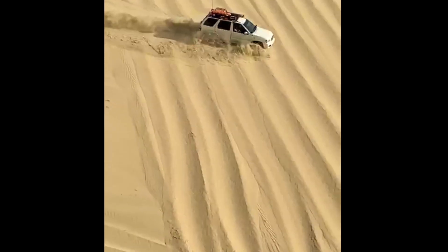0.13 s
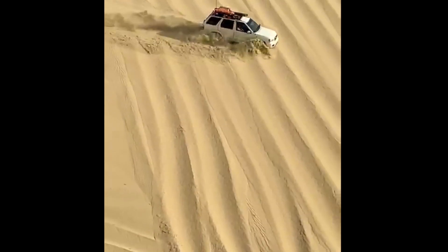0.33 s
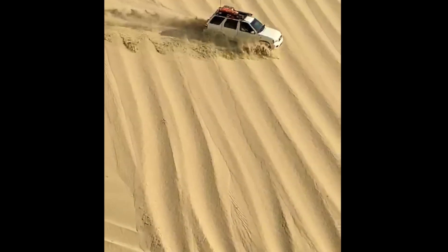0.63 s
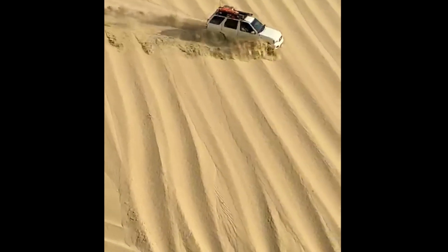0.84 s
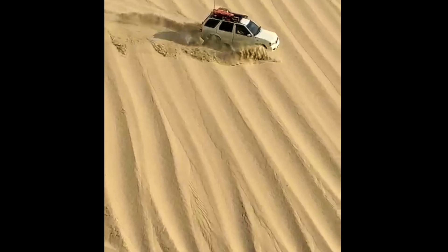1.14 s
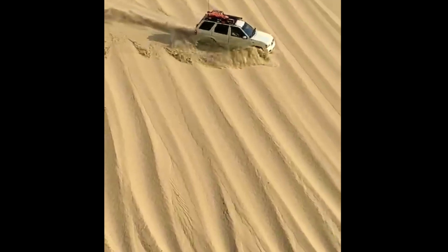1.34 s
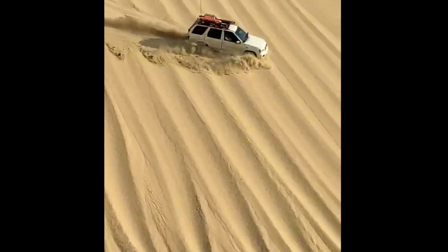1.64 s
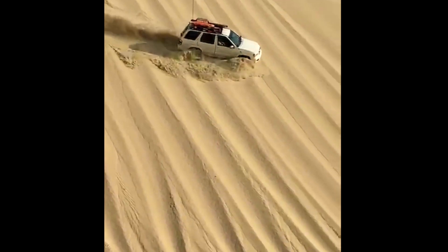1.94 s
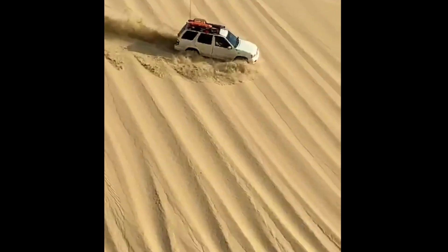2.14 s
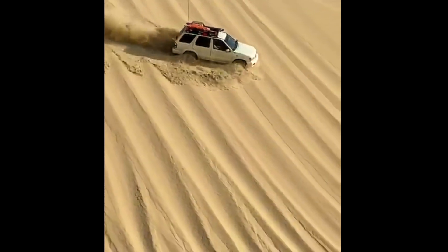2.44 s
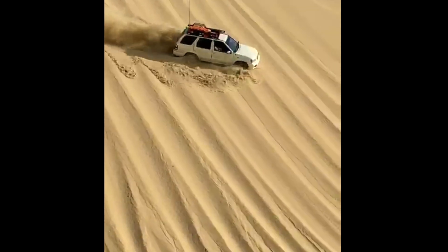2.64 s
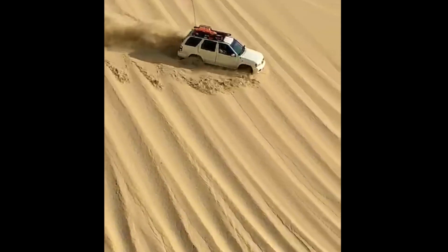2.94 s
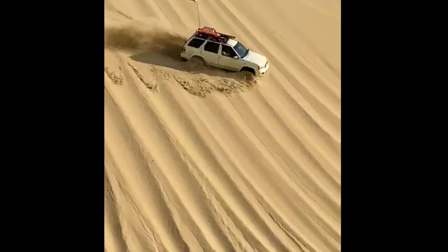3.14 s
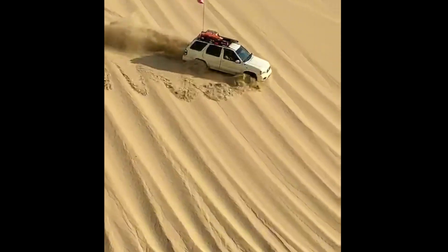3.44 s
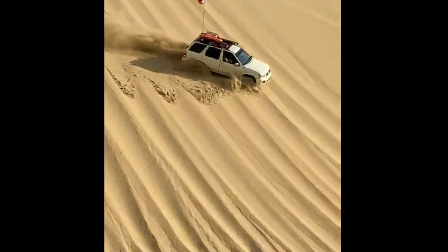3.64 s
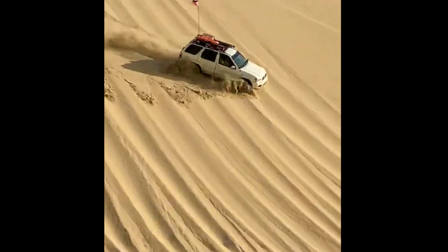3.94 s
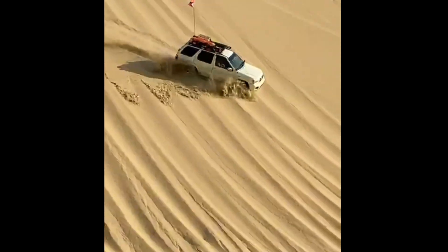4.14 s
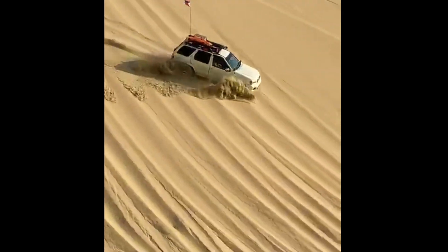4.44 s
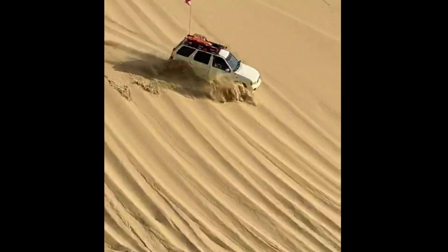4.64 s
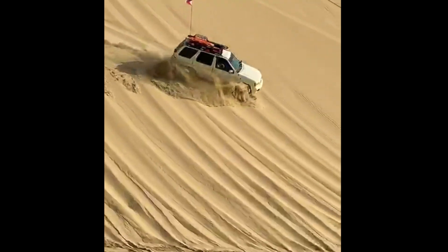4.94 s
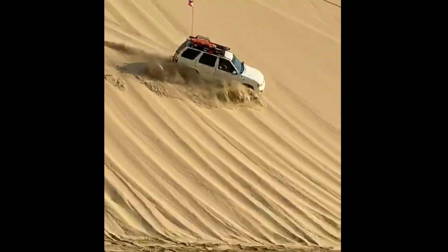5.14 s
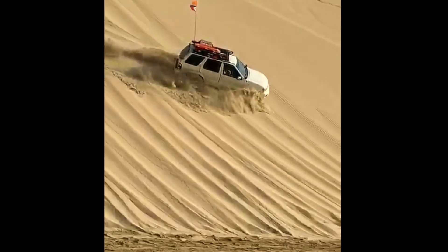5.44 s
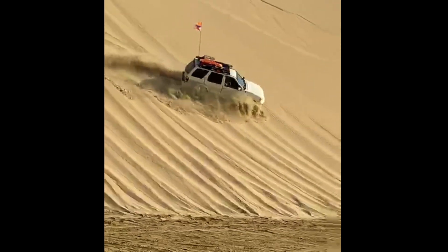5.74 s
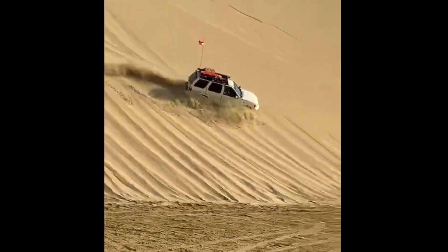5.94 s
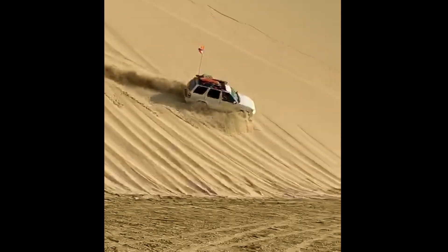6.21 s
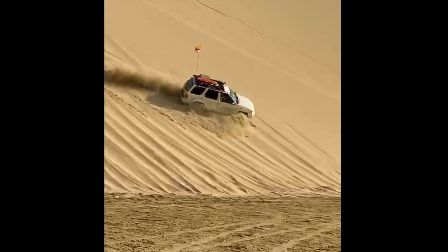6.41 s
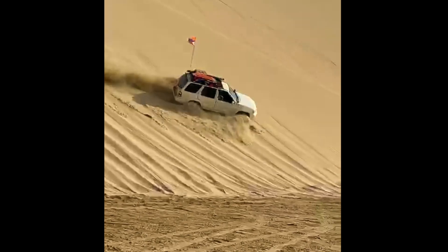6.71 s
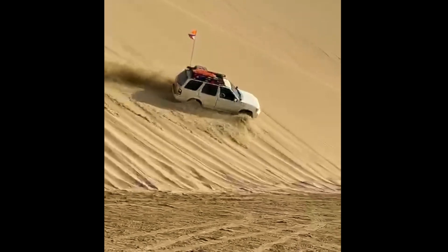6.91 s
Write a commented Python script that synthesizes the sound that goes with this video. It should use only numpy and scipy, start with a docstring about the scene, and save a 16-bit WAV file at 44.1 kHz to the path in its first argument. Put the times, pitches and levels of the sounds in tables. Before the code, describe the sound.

Outdoors with no echo, strong wind buffets the microphone over the strained howl of an SUV driving through soft sand. Sand sprays and small bits tick against the body all along. As the gusts settle, the revs dip and climb again, the howl turning to a growl with a few faint squeals. Toward the end a deep exhaust boom takes over, joined by droning tyres and rasping valves.

```python
"""A six-cylinder SUV crosses a dune at high revs, its speed sagging and recovering in the soft sand.
At first the intake howls and gusts buffet the microphone, hardest in the first two seconds.
All along, the tyres throw hissing sand and ticking grit. Past the middle the belt squeals, the
muffler hums and the flank whooshes by. From about five seconds the exhaust booms; at the end the
spinning tread drones and the valves rasp as the nose comes round."""
import sys
import numpy as np
from scipy import signal
from scipy.fft import rfft, irfft, next_fast_len
from scipy.io import wavfile
from scipy.ndimage import uniform_filter1d, map_coordinates

SR = 44100
rng = np.random.default_rng(int(sys.argv[2]) if len(sys.argv) > 2 else 0)


def master_out(mix):
    """Clip the mix to full scale and print it as 16-bit PCM to the path in sys.argv[1]."""
    frames = np.transpose(np.atleast_2d(mix))
    ceiling = np.clip(frames, -1, 1)
    pcm = np.round(ceiling * 32767).astype(np.int16)
    wavfile.write(sys.argv[1], SR, pcm)


N = 311787


def amp(db):
    """Decibels to gain."""
    return 10 ** (np.asarray(db) / 20)


def unit(x):
    """x at rms 1."""
    return x / np.sqrt(np.mean(x ** 2) + 1e-20)


def along(points, hz):
    """(Hz, value) points read on a log frequency axis."""
    freqs, values = np.transpose(points)
    return np.interp(np.log(hz + 1), np.log(freqs + 1), values)


def curves(rows):
    """One automation curve, a value per sample, for each column after the time."""
    times, *columns = np.transpose(rows)
    return [np.interp(np.arange(N) / SR, times, column) for column in columns]


def wobble(rate):
    """A smooth random curve, rate knots a second."""
    knots = rng.standard_normal(8192)
    coarse = np.arange(0, N, 32)
    return np.interp(np.arange(N), coarse, map_coordinates(knots, [coarse * rate / SR], mode="wrap"))


def filtered(x, response):
    """x through a complex frequency response."""
    size = next_fast_len(N + SR // 2)
    return irfft(rfft(x, size) * response(np.fft.rfftfreq(size, 1 / SR)), size)[..., :N]


def lows(x, cutoff_hz, slope=8):
    """The part of x below the cutoff, with no phase shift."""
    return filtered(x, lambda hz: 1 / (1 + (hz / cutoff_hz) ** slope))


def band(hz, centre_hz, width_hz):
    """Response of one resonance."""
    return 1j * hz * width_hz / (centre_hz ** 2 - hz ** 2 + 1j * hz * width_hz)


def delayed(x, lag):
    """x heard lag seconds later; the lag may move."""
    return np.array([np.interp(np.arange(N) - lag * SR, np.arange(N), channel) for channel in x])


def steady(x, size):
    """x with its swells longer than size samples evened out."""
    power = uniform_filter1d(np.mean(x ** 2, axis=0), size)
    return x / np.sqrt(np.abs(power) + 1e-12)


def spread(pair, spectrum):
    """Two unrelated signals become coloured, partly alike left and right channels of rms 1."""
    # likeness of left and right (frequency [Hz], correlation [0-1])
    likeness = [(60, .99), (130, .975), (220, .92), (350, .76), (550, .6), (800, .78), (1200, .78),
                (1900, .94), (4000, .95), (4500, .85), (5000, 1), (5600, .85), (7300, 1)]

    def response(hz):
        angle = np.arccos(np.clip(along(likeness, hz), -1, 1)) / 2
        return amp(along(spectrum, hz)) * [np.cos(angle), np.sin(angle)]

    mid, side = filtered(pair, response)
    return unit(np.array([mid + side, mid - side]))


def white():
    """Two unrelated white noises."""
    return rng.standard_normal((2, N))


def patchy_noise(depth_db):
    """Two noises of rms 1 with patches of random gain in time and frequency."""
    frames = signal.stft(white(), nperseg=512)[2]
    patches = uniform_filter1d(rng.standard_normal(frames.shape[1:]), size=5, axis=0)
    patches = unit(uniform_filter1d(patches, size=14, axis=1))
    return unit(signal.istft(frames * amp(depth_db * patches), nperseg=512)[1][:, :N])


def whistle(hz, width_hz):
    """Narrow noise of rms 1 round a moving pitch."""
    flutter = wobble(width_hz) + 1j * wobble(width_hz)
    return unit(np.real(flutter * np.exp(2j * np.pi * np.cumsum(hz) / SR)))


def tones(cycles, orders, fade_db, rough):
    """Partials at multiples of a cycle rate; each fades slowly and flutters by its roughness."""
    out = np.zeros(N)
    for order, db in orders:
        flutter = (1 + rough * (wobble(40) + 1j * wobble(40))) / np.sqrt(1 + 2 * rough ** 2)
        gain = amp(db + fade_db * wobble(3.6))
        out += gain * np.real(flutter * np.exp(2j * np.pi * (order * cycles + rng.random())))
    return unit(out)


def engine_speed(flywheel_s=.11):
    """Four-stroke cycles a second; the flywheel rounds off every change."""
    # revs sagging and recovering (time [s], cycle rate [Hz])
    revs = [(0, 42.75), (.58, 42.75), (.87, 41.0), (1.06, 42.3), (1.44, 41.4), (1.74, 43.8), (2.04, 41.6),
            (2.55, 44.2), (2.9, 42.3), (3.15, 41.6), (3.5, 39.9), (3.9, 37.2), (4.15, 38.1), (4.95, 38.95),
            (5.25, 41.2), (5.56, 40.05), (5.98, 42.5), (6.33, 41.85), (6.6, 42.75), (7.07, 41.5)]
    return uniform_filter1d(curves(revs)[0], size=int(flywheel_s * SR), mode="nearest")


def intake(cycles, waver_cycles=.00395):
    """The intake howls round the third and fourth firing harmonics, then breaks into a growl."""
    # howl faders (time [s], lower howl [dB], upper howl [dB])
    faders = [(0, -42.5, -42), (1.1, -44, -39.5), (1.42, -42, -44), (1.75, -44.5, -42), (2, -48, -46),
              (2.22, -48, -42), (2.65, -52, -48), (2.92, -49, -39.5), (3.38, -47, -40.5), (3.52, -54, -59),
              (5.3, -51, -62.5), (6.4, -44, -59), (7.07, -46, -44)]
    # partials of each howl (order [x cycle rate], relative level [dB])
    lower_orders = [(18, 8.5), (19, 1.5), (20, -7)]
    upper_orders = [(24, 0), (25, -15)]
    lower_db, upper_db = curves(faders)
    growl = curves([(0, .25), (1.4, .25), (1.9, .35), (2.6, .6), (2.95, .45), (3.4, .55),
                    (4, 1.2), (7.07, 2)])[0]
    crank = cycles + waver_cycles * wobble(5)
    breakup = amp(1.4 * wobble(15))
    lower = amp(lower_db) * tones(crank, lower_orders, fade_db=-.5, rough=growl)
    upper = amp(upper_db) * breakup * tones(crank, upper_orders, fade_db=2.5, rough=growl)
    return lower + upper


def clatter(cycles, spectrum):
    """Each engine cycle repeats a run of tiny knocks, which changes within a few turns."""
    pair = np.zeros((2, N))
    for channel in pair:
        for knocks in rng.standard_normal((3, 400)):
            channel += wobble(5) * np.interp(cycles % 1, np.linspace(0, 1, len(knocks)), knocks)
    return spread(steady(pair, size=2200), spectrum)


def engine_bay(cycles, throb=.44, airbox_hz=772, cruise_hz=42, rev_db_per_hz=.68):
    """The block clatters and the valves rasp; air pulsed by the six firings rings the airbox."""
    # faders as the nose comes round (time [s], block at cruising revs [dB], valve rasp [dB])
    faders = [(0, -42.5, -53), (1.85, -43, -50), (2.6, -41, -56.5), (3.7, -40.5, -56.5), (5.6, -41.5, -49),
              (6.3, -39, -38.5), (7.07, -39, -45.5)]
    # colour of the block and its air (frequency [Hz], relative level [dB])
    colour = [(150, -120), (450, -26.5), (660, -9.5), (790, 10), (910, 7), (1040, 1), (1180, 4),
              (1380, 3.5), (1580, -2.5), (1920, -0.5), (2150, -3), (2300, -4), (2600, -20.5), (6000, -70)]
    block_db, valves_db = curves(faders)
    rev_db = rev_db_per_hz * (engine_speed() - cruise_hz)
    firing = 1 + throb * np.cos(2 * np.pi * 6 * cycles)
    air = spread(patchy_noise(depth_db=2) * firing, colour)
    air = unit(filtered(air, lambda hz: 1 + amp(-2) * band(hz, airbox_hz, width_hz=30)))
    knocks = clatter(cycles, colour)
    block = amp(-3) * (knocks - lows(knocks, 950)) + amp(2.5) * air
    return amp(block_db + rev_db) * block + amp(valves_db) * valve_rasp(cycles, firing)


def valve_rasp(cycles, firing, hiss_db=-7, swell_db=1.4, waver_s=.00025):
    """Valve clatter and pulsed air ring swelling resonances; moving air wavers their arrival."""
    # colour of the valve noise (frequency [Hz], relative level [dB])
    colour = [(900, -31), (1500, -2.5), (4500, 1.5), (12000, -10.5)]
    # resonances (centre [Hz], width [Hz], gain from the flank [dB], gain head-on [dB])
    resonances = [(1594, 150, -9.5, -15), (1945, 130, -7, -8), (2300, 130, -8.5, -6.5),
                  (2845, 570, -6.5, -20), (3334, 150, -9, -4), (3600, 230, -6.5, -10), (3756, 230, -7, -16),
                  (4128, 200, -7.5, -5.5), (4520, 280, -14, -10)]
    # the nose turning this way (time [s], head-on share [0-1])
    nose_turn = [(6.5, 0), (6.9, 1)]
    drive = .5 * clatter(cycles, colour) + spread(white() * firing, colour)
    head_on = curves(nose_turn)[0]
    out = amp(hiss_db) * unit(drive)
    for centre, width, flank_db, nose_db in resonances:
        ring = unit(filtered(drive, lambda hz: band(hz, centre, width) ** 2))
        out += ring * amp(flank_db + head_on * (nose_db - flank_db) + swell_db * wobble(11))
    return delayed(out, waver_s * wobble(9))


def sand(spray_boost_db=9, clump_db=.44):
    """The tyres churn with a low roar and fling clumps of fine grains."""
    # wheels labouring in the sand (time [s], churn [dB], spray before its boost [dB])
    faders = [(0, -36, -56), (.45, -35, -54.5), (1.3, -49, -52.5), (1.95, -34, -55.5), (2.55, -34, -51),
              (3, -39.5, -51.5), (3.5, -36.5, -52.5), (4, -38, -55.5), (5, -38.5, -53.5), (5.7, -38, -54.5),
              (6.3, -38, -51), (7.07, -37.5, -50.5)]
    # colours of the roar and the hiss (frequency [Hz], relative level [dB])
    churn_colour = [(40, -67), (120, -25.5), (280, -8), (380, 2), (470, -1), (540, -0.5), (720, -3),
                    (950, -10), (1500, -39.5), (3000, -120)]
    spray_colour = [(400, -77), (1500, -10), (2700, 4), (3700, 2.5), (4400, -6), (5000, 0), (5600, 2),
                    (6200, 1.5), (7000, -3.5), (8500, -18.5), (12000, -10)]
    churn_db, spray_db = curves(faders)
    churn = amp(churn_db + wobble(17)) * spread(patchy_noise(depth_db=1.5), churn_colour)
    grains = patchy_noise(depth_db=2) * amp(wobble(900))
    spray = amp(spray_db + spray_boost_db + clump_db * wobble(35)) * spread(grains, spray_colour)
    return churn + spray


def wind(lump_db=2, flutter_db=2.5, split_hz=360, overload_db=-5, breeze_db=-43, sway_db=2.8):
    """Eddies strike the microphone in ragged bursts that overload it, over a rumbling breeze."""
    # colours of gusts and breeze (frequency [Hz], relative level [dB])
    gust_colour = [(15, -47), (28, -33.5), (45, -6.5), (65, 3), (170, 0.5), (280, -2), (440, -6.5),
                   (560, -12.5), (700, -15.5), (950, -60), (1500, -120)]
    breeze_colour = [(15, -42.5), (28, -20), (48, 0), (70, -3), (110, -3), (200, -21.5), (500, -120)]
    eddies = steady(spread(white(), gust_colour), size=600) * amp(lump_db * wobble(70))
    rumble = lows(eddies, split_hz)
    buffet_gain, flutter_gain = gust_strength()
    flutter = flutter_gain * amp(flutter_db * wobble(110)) * (eddies - rumble)
    pressure = buffet_gain * rumble + flutter + slaps()
    overloaded = amp(overload_db) * np.tanh(pressure / amp(overload_db))
    breeze = amp(breeze_db + sway_db * wobble(10)) * spread(white(), breeze_colour)
    return lows(overloaded, 750) + breeze


def gust_strength(attack_s=.008, build_db=3.6, t60=.072):
    """Gains of low buffet and brighter flutter: each gust sets in, builds and collapses."""
    # wind between gusts (time [s], level [dB])
    bed = [(0, -41.5), (.35, -37), (1.4, -36), (1.8, -26), (2.9, -38), (3.5, -35), (4.6, -56.5), (5.1, -39),
           (5.9, -40.5), (7.07, -41)]
    # gusts (start [s], length [s], crest [dB], flutter relative to buffet [ratio])
    gusts = [(0.261, .035, -31.5, 0.8), (0.462, 0.0041, -23, 0.4), (0.519, 0.0073, -19, 0.6),
             (0.544, 0.07, -20, .7), (0.734, 0.025, -18.5, 0), (0.781, 0.006, -15.5, 0.7),
             (0.812, 0.018, -15.5, 0.7), (0.842, 0.04, -12, 0.6), (0.908, 0.014, -14, 0.8),
             (1.037, 0.017, -17.5, 0.3), (1.205, 0.032, -14.5, 0.1), (1.25, 0.04, -17.5, 0.4),
             (1.301, 0.0067, -21, 0), (1.345, 0.0065, -19.5, 0), (1.446, 0.033, -24.5, 0.4),
             (1.496, 0.072, -16, 0.6), (1.612, 0.0064, -21, 0.3), (1.641, 0.018, -17.5, 1.2),
             (1.693, 0.024, -17, 1.3), (1.739, 0.008, -10, 0.9), (1.796, 0.025, -19.5, 2.1),
             (1.855, 0.0093, -22.5, 1.5), (2.108, .08, -25.5, 1.5), (2.556, .17, -30.5, 1.3),
             (3.442, 0.02, -30.5, 0.9), (5.492, .066, -29, 0.4)]
    t = np.arange(N) / SR
    power = np.tile(amp(curves(bed)[0]) ** 2, (2, 1))
    for start, length, db, bright in gusts:
        near = slice(max(int((start - .1) * SR), 0), int((start + .4) * SR))
        age = t[near] - start
        attack = np.clip(age / attack_s + 1, 0, 1)
        still_to_build = np.clip(1 - age / length, 0, 1)
        collapse_db = 60 * np.maximum(age - length, 0) / t60
        gust = attack * amp(db - build_db * still_to_build - collapse_db)
        power[:, near] += np.array([gust, bright * gust]) ** 2
    return np.sqrt(power)


def slaps(life_cycles=5.6):
    """The sharpest eddies slap the microphone: one strong pressure swing, gone in a few cycles."""
    # slaps (time [s], starting level [dB], pitch [Hz])
    hits = [(.785, -13, 220), (0.829, -13, 127), (.92, -8.5, 169), (1.511, -11, 520), (1.617, -10.5, 110),
            (1.7408, -2, 152), (1.791, -16, 465), (2.054, -14, 610), (2.179, -15, 201)]
    t, out = np.arange(SR // 10) / SR, np.zeros(N)
    for start, db, hz in hits:
        decay = amp(db - 60 * t * hz / life_cycles)
        out[round(start * SR):][:len(t)] += decay * np.sin(2 * np.pi * hz * t)
    return out


def grit(level_db=-6, t60=.082, snap_s=.0095, width_hz=1800, fine_count=70, fine_db=-43, fine_hz=3600):
    """Coarse bits strike the body with dry, pitched ticks among a random crackle of small ones."""
    # the larger bits (time [s], relative level [dB], centre [Hz])
    coarse = [(1.2067, -33.5, 4200), (1.2695, -28.5, 1980), (1.3618, -35.5, 1940), (1.6242, -35.5, 4140),
              (2.2453, -33, 2850), (2.5361, -29, 3400), (2.935, -34, 3630), (3.1363, -31.5, 3350),
              (3.3967, -29, 4040), (3.681, -34.5, 3800), (3.7559, -32, 4230), (4.14, -38, 4700),
              (4.2064, -34, 4310), (4.3251, -35.5, 4020), (4.6239, -35.5, 4370), (4.9494, -37, 2430),
              (5.3692, -34.5, 4500), (5.5902, -32.5, 3290), (6.7072, -28.5, 4340)]
    # colour common to all ticks (frequency [Hz], relative level [dB])
    colour = [(300, -73.5), (1200, -15), (1900, 3.5), (3700, -2), (4700, -1.5), (8000, -16), (12000, -29)]
    t, ticks = np.arange(SR // 10) / SR, np.zeros(N)
    freqs = np.fft.rfftfreq(len(t), 1 / SR)
    decay = amp(-60 * t / t60) + amp(-60 * t / snap_s)
    draws = zip(rng.random(fine_count), rng.standard_normal((fine_count, 2)))
    fine = [(when * N / SR, fine_db + 3 * size, fine_hz * np.exp(.3 * pitch))
            for when, (size, pitch) in draws]
    for start, db, hz in list(coarse) + fine:
        width = width_hz * np.exp(rng.standard_normal() / 2)
        response = band(freqs, hz, width) * amp(along(colour, freqs))
        ring = unit(irfft(rfft(rng.standard_normal(len(t))) * response, len(t)))
        span = ticks[round(start * SR):][:len(t)]
        span += (amp(db) * decay * ring)[:len(span)]
    return amp(level_db) * ticks


def belt(cycles):
    """A belt-driven pulley whines and lets out brief, ragged squeals."""
    # whine fader (time [s], level [dB])
    fader = [(0, -59), (1.5, -44), (3.1, -41.5), (3.55, -55), (4.4, -64), (4.8, -43.5), (5.4, -55),
             (7.07, -45)]
    # pulley partials (order [x cycle rate], relative level [dB])
    orders = [(23.12, -3.5), (46.24, -10.5)]
    # squeals (start [s], end [s], first pitch [Hz], last pitch [Hz], level [dB])
    squeals = [(3.28, 3.55, 4770, 4560, -58.5), (3.86, 4.14, 1735, 1760, -48),
               (4.58, 4.99, 2690, 2695, -48.5)]
    out = amp(curves(fader)[0]) * tones(cycles, orders, fade_db=2, rough=.5)
    for start, end, start_hz, end_hz, db in squeals:
        progress = np.clip((np.arange(N) / SR - start) / (end - start), 0, 1)
        swell = np.sqrt(np.abs(np.sin(np.pi * progress)))
        out += amp(db) * swell * whistle(start_hz + progress * (end_hz - start_hz), width_hz=20)
    return out


def muffler(cycles):
    """The muffler hums, mainly on the second firing harmonic, while the flank faces this way."""
    # hum fader (time [s], level [dB])
    fader = [(3.1, -62), (3.6, -46), (4.4, -45), (4.95, -39.5), (5.2, -52), (6.6, -52)]
    # hum partials (order [x cycle rate], relative level [dB])
    orders = [(8, -7), (12, 4)]
    return amp(curves(fader)[0]) * tones(cycles, orders, fade_db=5.5, rough=.26)


def whoosh(width_hz=150, upper_ratio=1.62, upper_db=-5):
    """Two hollow bands of rushing air glide upward together as the flank passes."""
    # the lower band (time [s], centre [Hz], level [dB])
    glide = [(3.3, 1040, -70.5), (4.05, 1059, -46.5), (4.8, 1179, -45), (5.3, 1208, -47),
             (5.9, 1222, -68.5)]
    hz, db = curves(glide)
    return amp(db) * (whistle(hz, width_hz) + amp(upper_db) * whistle(upper_ratio * hz, width_hz))


def tread():
    """Tread blocks drone in arches of pitch as the wheels spin up."""
    # tread drone (time [s], pitch [Hz], level [dB])
    drone = [(3.7, 230.4, -79), (4, 238, -45.5), (4.25, 248, -43), (4.5, 238, -54), (5.7, 227.9, -52.5),
             (6, 238, -37.5), (6.3, 226, -40), (6.45, 240, -32.5), (6.65, 250.4, -28.5), (6.85, 236.6, -31),
             (7.07, 207, -38.5)]
    hz, db = curves(drone)
    return amp(db) * tones(np.cumsum(hz) / SR, [(1, 0)], fade_db=.5, rough=.24)


def exhaust(cycles, pipe_hz=131, rough=.48):
    """Tones roughened by uneven combustion and puffs of gas boom in two pipe resonances."""
    # faders, rising once the car is abreast (time [s], low resonance [dB], high resonance [dB])
    faders = [(0, -49, -69), (3.7, -43.5, -61), (4.2, -43.5, -59), (4.7, -39, -58.5), (5.1, -26.5, -49),
              (5.33, -27.5, -34), (5.55, -41, -57), (6.1, -32, -38), (6.75, -31.5, -27.5),
              (7.07, -31.5, -29.5)]
    # partials in each resonance (order [x cycle rate], relative level [dB])
    low_orders = [(2, -10.5), (3, -15), (4, 0.5)]
    high_orders = [(5, 0.5), (6, -2), (7, -5)]
    # colour of the gas in each resonance (frequency [Hz], relative level [dB])
    low_colour = [(20, -54.5), (50, -24.5), (105, 0.5), (135, -1), (165, -7), (195, -21), (300, -39),
                  (600, -120)]
    high_colour = [(60, -75), (170, -19), (215, 3), (250, -6), (285, -9.5), (330, -20.5), (450, -55),
                   (900, -120)]
    low_db, high_db = curves(faders)
    puffs = 1 + .5 * np.cos(2 * np.pi * cycles)
    # the pipe's own steady note throbs against the fourth order
    note = amp(-5) * tones(pipe_hz * np.arange(N) / SR, [(1, 0)], fade_db=1, rough=rough)
    low_tones = amp(-1.5) * tones(cycles, low_orders, fade_db=-2, rough=rough)
    low_gas = amp(-10) * spread(puffs * white(), low_colour)
    high_tones = amp(-4) * tones(cycles, high_orders, fade_db=2, rough=rough)
    high_gas = amp(-8) * spread(puffs * white(), high_colour)
    return amp(low_db) * (note + low_tones + low_gas) + amp(high_db) * (high_tones + high_gas)


def ground_bounce(x, absorb_hz=2300):
    """A duller copy off the sand combs the car's sound; the comb slides up as the lag shrinks."""
    # the bounce comes sooner as the car descends (time [s], lag [s], share [0-1])
    bounce = [(0, .0027, 0.23), (2, 0.002625, 0), (3.2, 0.00244, 0.06), (4.2, 0.00239, 0.02),
              (4.9, 0.0017, 0.06), (5.3, 0.0014, 0.23), (5.8, .00135, 0.29), (7.07, 0.00093, 0.38)]
    lag, share = curves(bounce)
    return x + share * delayed(lows(x, absorb_hz, slope=4), lag)


def mid_dip(x, dip_hz=600, width_hz=150):
    """A narrow band near 600 Hz drops out during the early gusts, hollowing the sound."""
    depth = curves([(0, .62), (1, 1), (1.4, 1), (1.65, 0)])[0]
    return x - depth * filtered(x, lambda hz: 1 / (1 + (2 * (hz - dip_hz) / width_hz) ** 4))


def scene():
    """One crank angle drives the engine; open sand gives one bounce and no reverberation."""
    cycles = np.cumsum(engine_speed()) / SR
    engine = intake(cycles) + belt(cycles) + exhaust(cycles) + muffler(cycles) + engine_bay(cycles)
    car = engine + whoosh() + tread() + sand() + grit()
    return mid_dip(ground_bounce(car)) + wind()


def record(dry, top_hz=11950):
    """The band-limited microphone channels differ in level and phase, opposed in the high treble."""
    # stereo balance (frequency [Hz], left minus right [dB])
    balance = [(350, 0), (560, 2.3), (780, 1), (1000, 4), (1170, 8), (1450, 3), (1900, .5), (2500, 0)]
    # stereo phase (frequency [Hz], left lead [rad])
    lead = [(350, 0), (780, .5), (980, .95), (1220, -.2), (2000, .1), (2700, .5), (4000, 0), (4550, .9),
            (4920, 2.8), (5080, 3.1), (5250, 1.9), (5550, 1.4), (6300, 1.8), (7100, 2.8), (8000, np.pi)]
    half = np.array([[.5], [-.5]])

    def response(hz):
        return amp(half * along(balance, hz)) * np.exp(1j * half * along(lead, hz)) * (hz < top_hz)

    return filtered(dry, response)


dry = scene()
out = record(dry)
master_out(out)
```